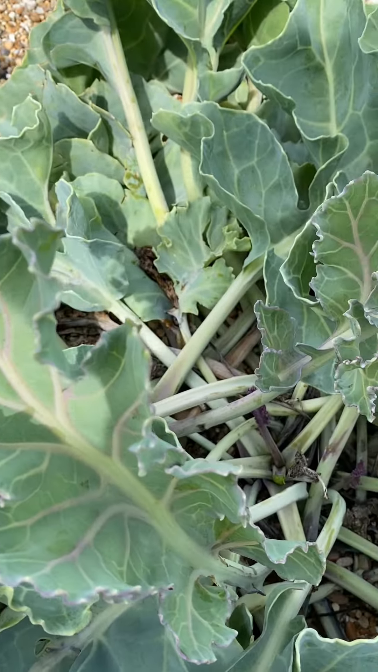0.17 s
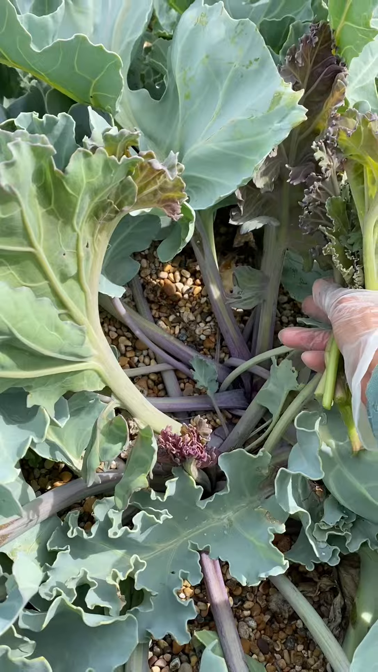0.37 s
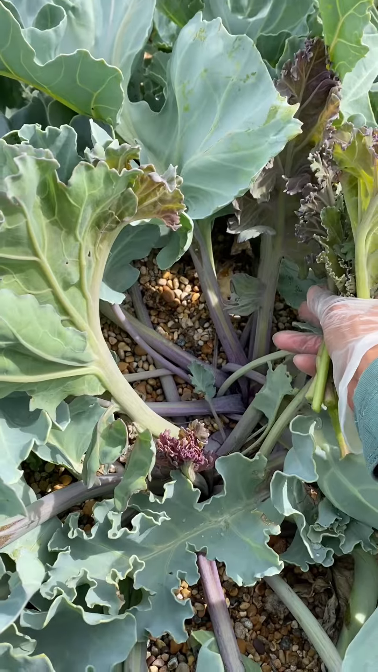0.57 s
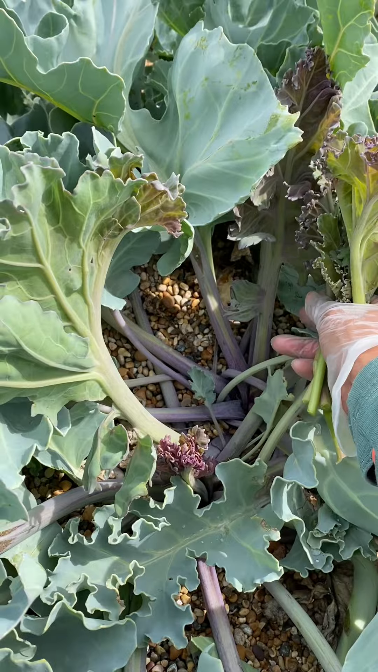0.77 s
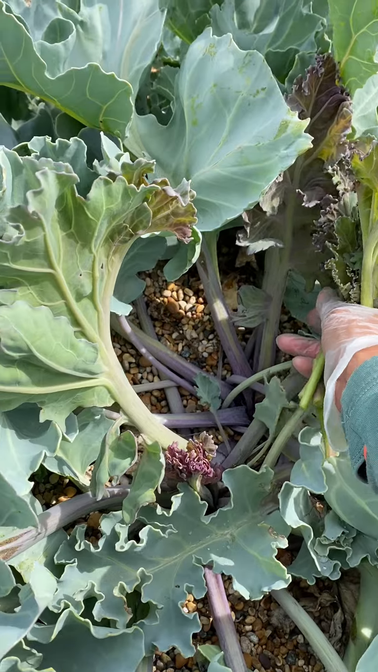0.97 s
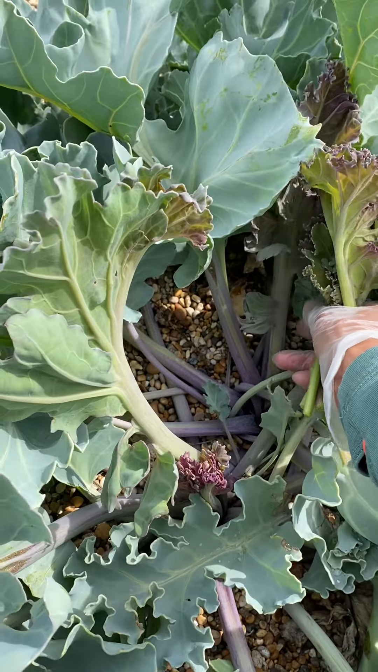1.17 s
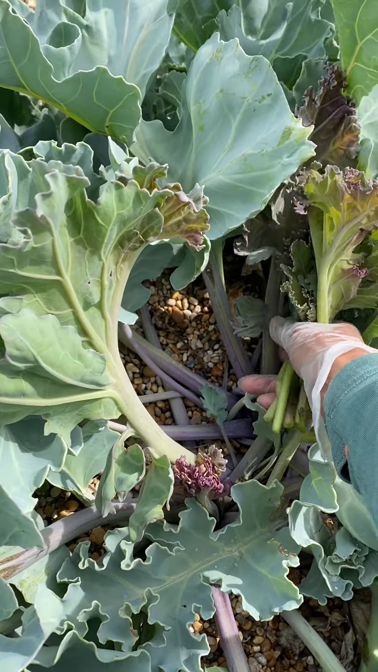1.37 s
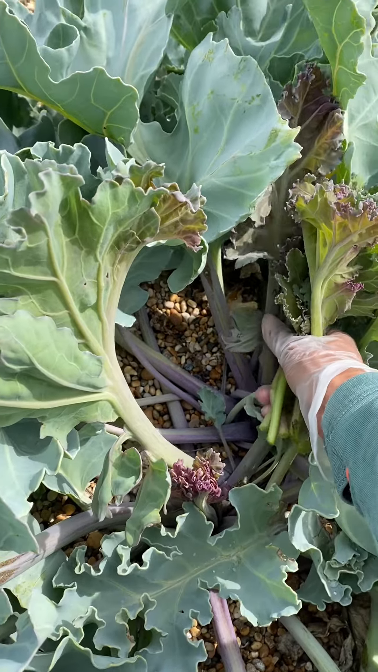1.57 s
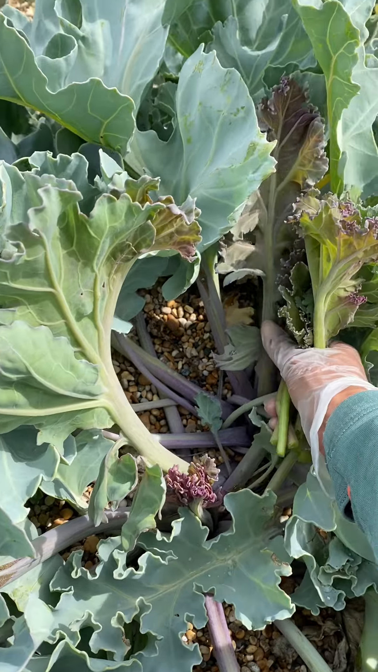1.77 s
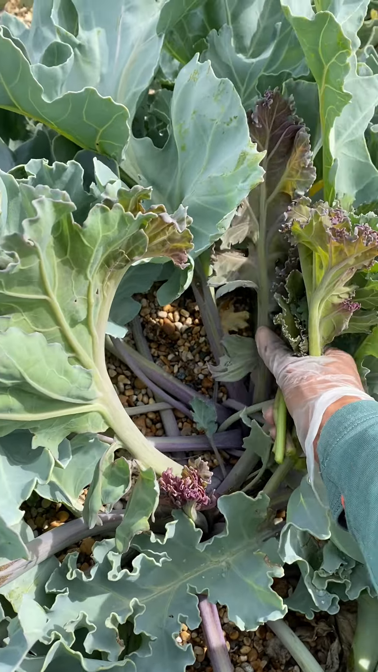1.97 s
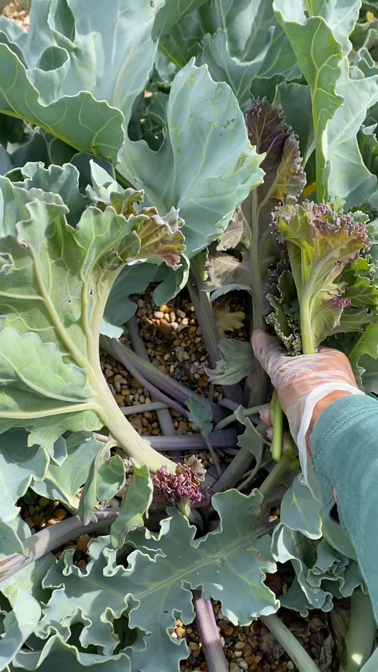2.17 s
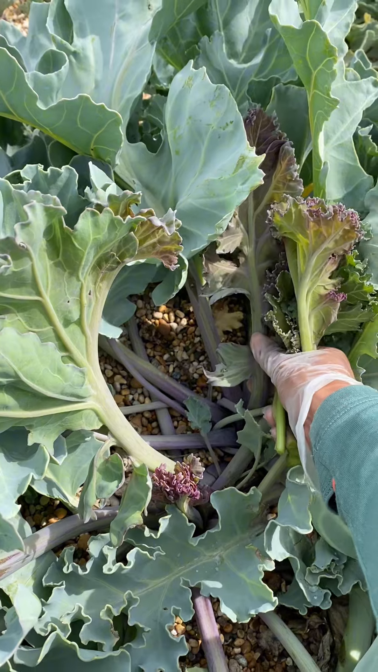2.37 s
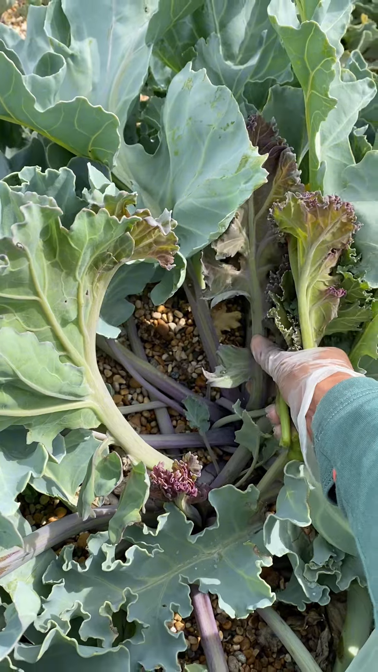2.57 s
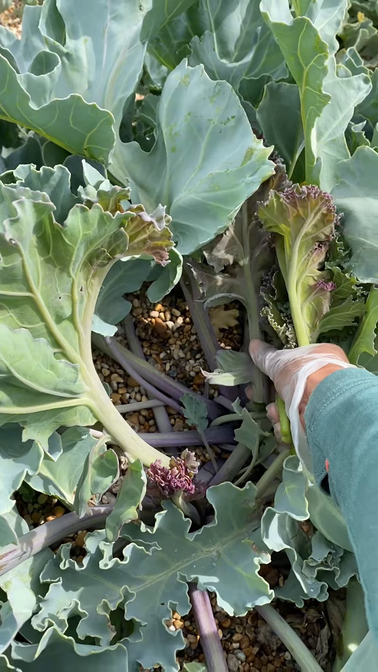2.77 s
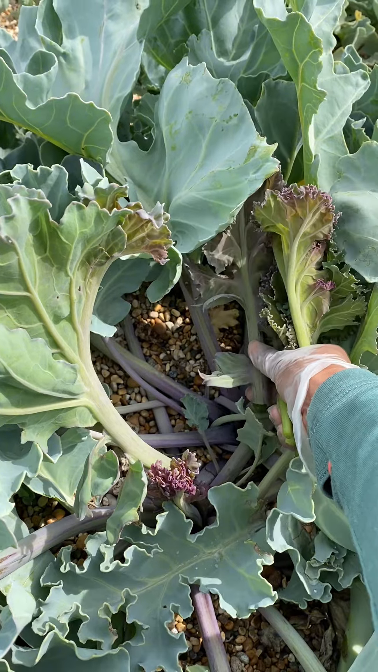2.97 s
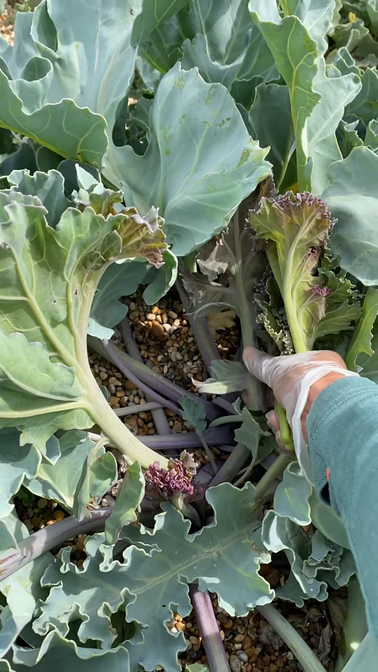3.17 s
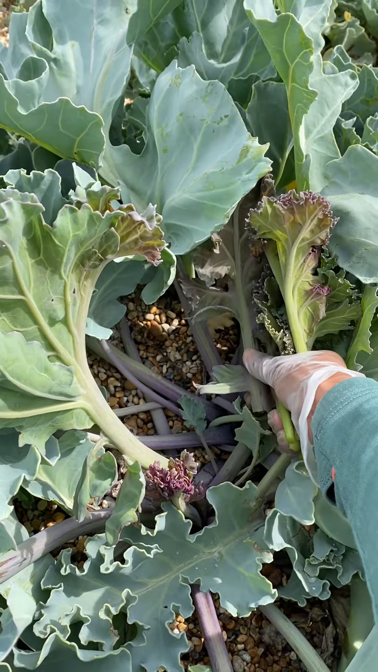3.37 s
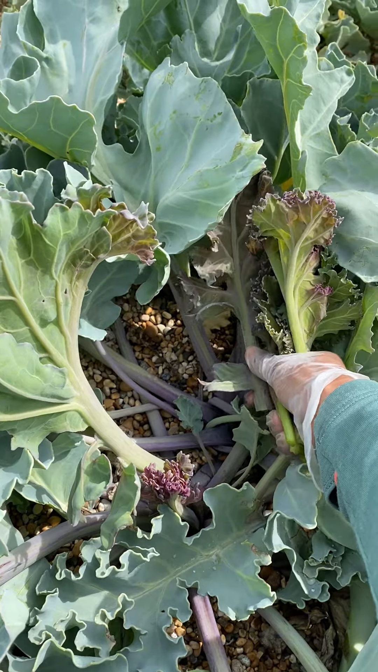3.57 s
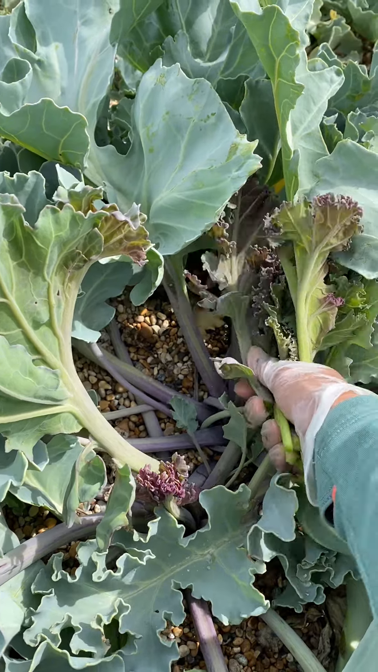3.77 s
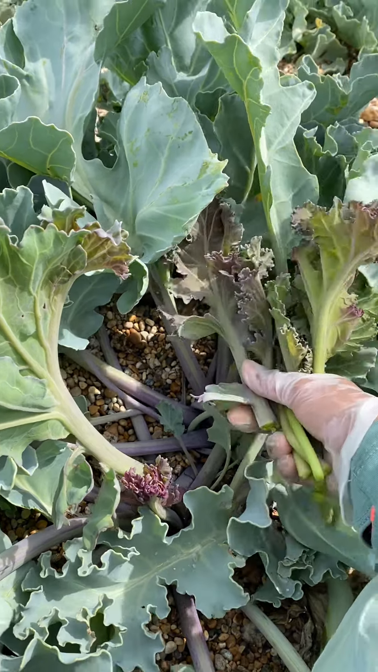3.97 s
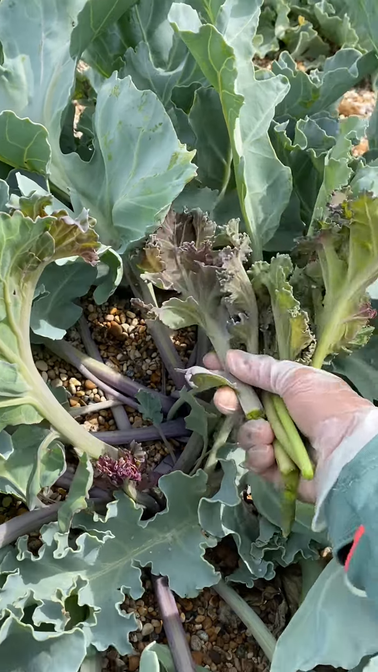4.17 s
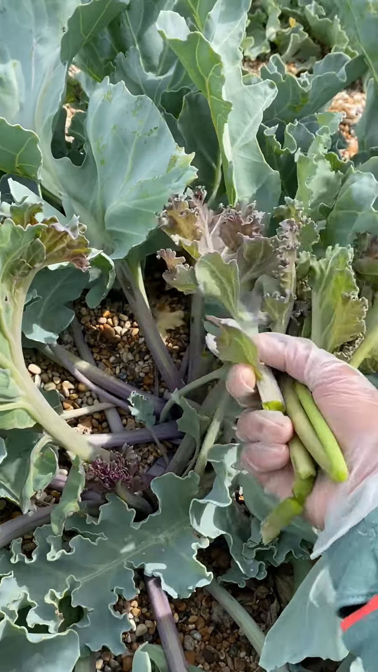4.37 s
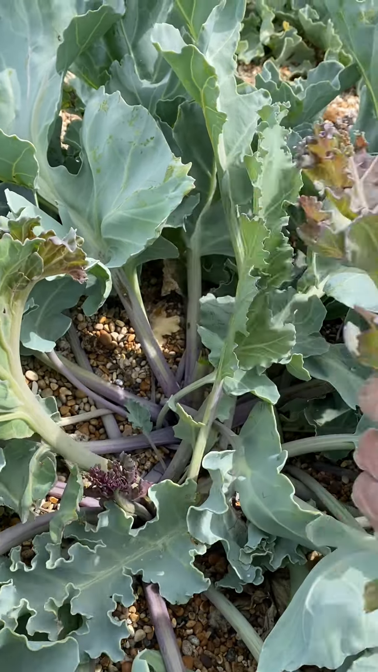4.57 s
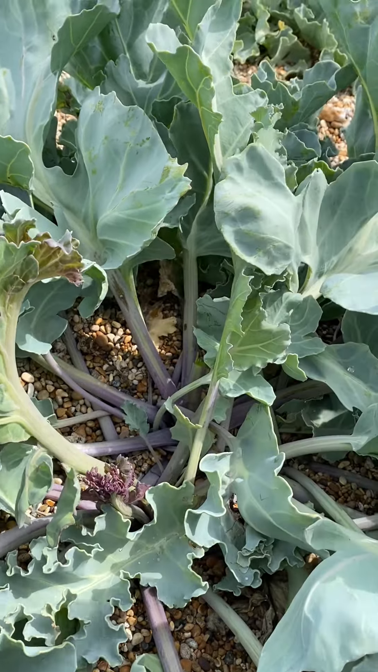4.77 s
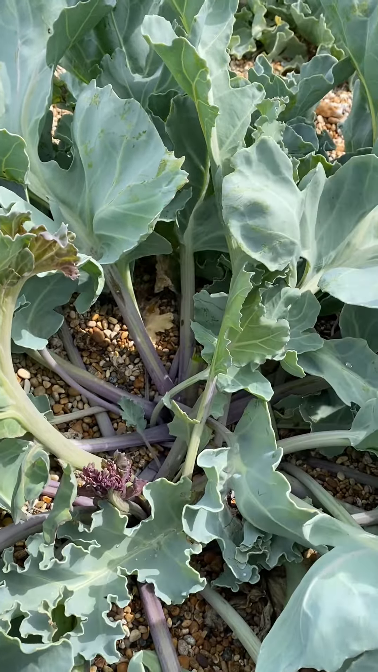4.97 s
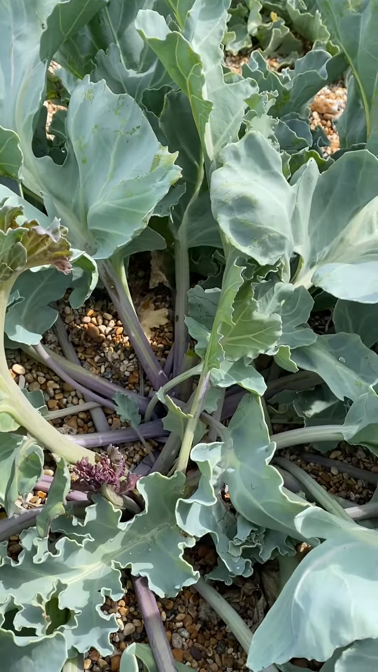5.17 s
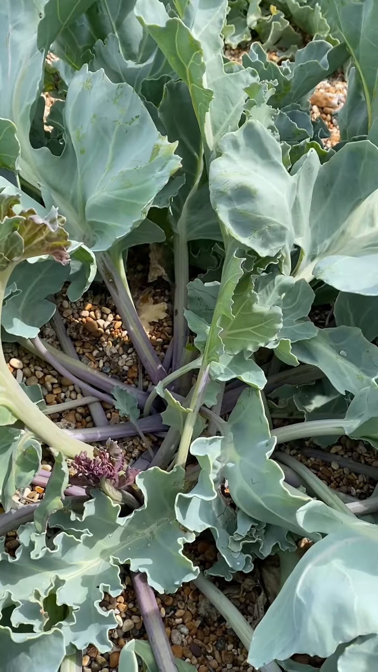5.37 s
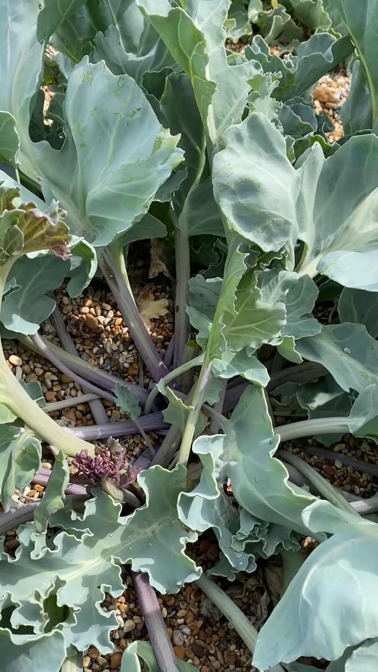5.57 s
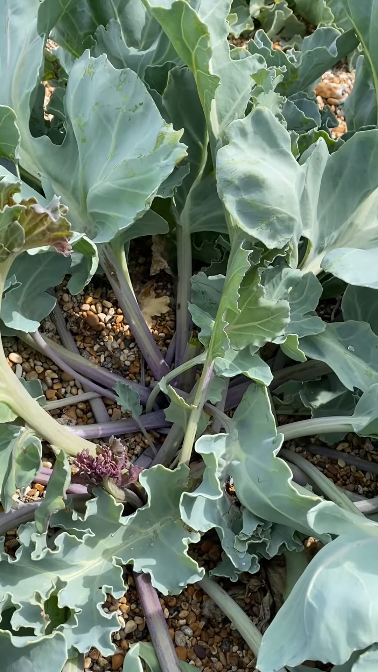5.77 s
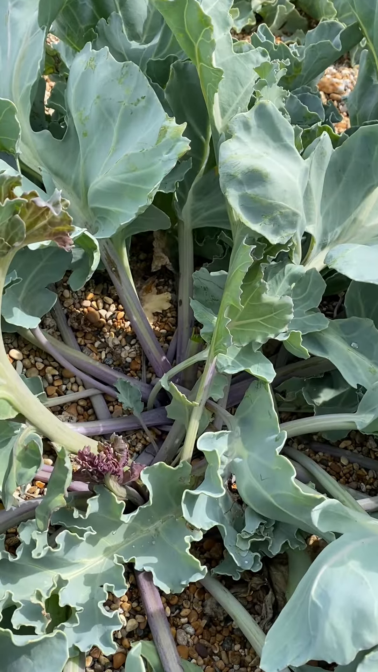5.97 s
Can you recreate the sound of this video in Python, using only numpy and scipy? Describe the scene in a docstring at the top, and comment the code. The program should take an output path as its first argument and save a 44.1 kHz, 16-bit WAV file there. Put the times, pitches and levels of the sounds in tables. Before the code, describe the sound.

A small stereo microphone outdoors takes gusts as low rumble, flutter and soft thumps, heaviest in the first half second, with a faint far hiss behind. A tiny snap comes at 0.1 s, a sharp tick at 0.33 and a clearer dry snap at 0.5. From 0.7 faint creaks begin, and thick waxy leaves rustle crisply from 0.9, crackles over a duller swish. From about 1.45 to 2.85 a bent stalk creaks in rapid stick-slip bursts, fibrous and juicy, dozens of tiny cracks, loudest near 2.75. Weaker creaking leads to fresh cracks from 3.1 to 3.45, with a strong gust thump at 3.3. Short pitched knocks colour the scattered snaps; a hard crack falls at 3.73, crisp rustle peaks at 4.03, and a bright snap hits at 4.4. Handling thins after 4.6; by 5.2 only wind, faint hiss and two tiny ticks at 5.56 and 5.84 remain.

```python
"""Wind rumbles, flutters and thumps on a small two-port microphone throughout, over a faint far hiss.
After a few early snaps, hands push through thick waxy leaves: tiny crackles on hiss, plus a duller swish.
A bent stalk soon creaks in rapid slips, densest near the middle: torn-fibre noise, ringing blade and stalk.
Short pitched rings (damped tones) join in, most often after 3 s; the handling thins out and the wind stays."""
import sys
import numpy as np
from scipy import signal
from scipy.fft import rfft, irfft, next_fast_len
from scipy.io import wavfile
from scipy.ndimage import uniform_filter1d, map_coordinates

SR = 44100
rng = np.random.default_rng(int(sys.argv[2]) if len(sys.argv) > 2 else 0)


def unload_wav(signal):
    """Save mono or channel-first audio to the path in sys.argv[1] as 16-bit WAV at rate SR, clipped to [-1, 1]."""
    wavfile.write(
        sys.argv[1],
        SR,
        np.round(np.clip(np.atleast_2d(signal).T, -1, 1) * 32767).astype(np.int16),
    )


N = 265614

# All source levels are ahead of the port response in record().
# Leaf rubbing: (time [s], crisp rustle [dB], broad-leaf swish [dB re rustle])
RUSTLE = [(.36, -70, -6), (.372, -48, -23.5), (.4, -66, -14), (.49, -58, -4), (.61, -64.5, -11),
          (.62, -64.5, 7), (.67, -62.5, 2.5), (.86, -61, 2), (.92, -37, -5.5), (1.0, -56, 5.5),
          (1.13, -38, -3.5), (1.33, -39.5, -4.5), (1.37, -29.5, -8.5), (1.41, -35, -0.5), (1.43, -44.5, -2),
          (1.6, -35, -8.5), (1.87, -31.5, -5.5), (2.1, -41, -1.5), (2.5, -35.5, 1.5), (2.68, -53, 5.5),
          (2.76, -37, 1.5), (2.83, -44, 2), (2.86, -53, 1), (2.91, -64.5, 1), (3.06, -45.5, -2),
          (3.18, -44, -5), (3.21, -44.5, -4), (3.25, -38.5, -2), (3.3, -50.5, -1), (3.43, -36.5, -2),
          (3.53, -48, 1.5), (3.64, -46.5, -4), (3.72, -29.5, -4), (3.87, -34.5, -5), (3.98, -40, 0),
          (4.03, -25, -13), (4.045, -37, -7), (4.15, -39, -0.5), (4.23, -37.5, -4.5), (4.38, -34.5, -5),
          (4.45, -45, -8.5), (4.61, -40.5, 0.5), (4.67, -41, -12.5), (4.78, -38, -1.5), (4.85, -44, -6.5),
          (5.0, -54.5, 4.5), (5.17, -61.5, -0.5), (5.2, -60, -21)]
# Steady hiss under the crackles: (time [s], share [re a full-level crackle])
STEADY_HISS = [(.6, 0.48), (1.4, 0.56), (1.55, 0.35), (3.6, 0.24), (3.75, 0.43), (5.2, 0.27)]
# Noise spectra of crisp rustle, swish and rubbing in the blade overtone: (frequency [Hz], level [dB per Hz])
CRISP_SPECTRUM = [(300, 1), (1000, -15), (3300, -3), (4300, -2), (4900, 2.5), (5600, 5), (6300, 2),
                  (8500, 3), (10000, 4), (12000, -3), (13500, -22), (15500, -31), (17000, -18)]
SWISH_SPECTRUM = [(300, -4.5), (600, -1.5), (1300, -1.5), (1750, -4.5), (2200, -2.5), (3000, -4),
                  (4000, -2), (8000, -58)]
RASP_SPECTRUM = [(2500, -40), (4400, -14), (4750, 0), (5150, 0), (5600, -14), (9000, -40)]
RASP_DB = -5  # re rustle, plus the struck overtone level

# Leaf blade: (time [s], share of higher ring [0-1], ring [dB re slip], struck overtone [dB re slip],
# rubbed ring [dB re swish])
BLADE = [(.55, 0.67, -9, -29, 1), (.65, 0.86, -2, -32, 1), (.95, 0.5, 1, -25, 3.5),
         (1.2, 0.2, -18, -11, -2.5), (1.39, 0.0, -19, -16, 5), (1.5, 0.42, -15, 3, -3),
         (2.85, 0.8, -6, -10.5, -6), (2.92, 0.6, -2.5, -10, -1), (3.09, 1, -6, -9, 3),
         (3.12, 0.78, -1.5, -4, -2), (3.9, 0.86, -16, -12, 0.5), (4.23, 0.76, 2, -5, -0.5),
         (4.4, 0.82, -25, -5.5, 0), (4.6, 0.2, -8, -14, -12.5)]
# Noise bands, lower then higher state: (ring [Hz], overtone [Hz], overtone level [dB])
BLADE_BANDS = [(2050, 4900, -2), (2550, 5000, -14)]
# Struck blade modes: (frequency [Hz], level at lower ring [dB], level at higher ring [dB])
RING_MODES = [(1974, 6.5, -5), (2470, -18, 7), (2930, -13, -2)]
OVERTONE_MODES = [(4790, -1, 0), (5090, 0, -3.5), (6250, -13, -6), (9490, -11, -1)]
RING_DECAY_S, OVERTONE_DECAY_S = .0024, .002  # time constants
NOISY_RING_DB = -5  # tearing noise in the ring, re struck ring

# Slips and snaps of stalks and leaf edges, each with its own body and length: (time [s], level [dB], stalk body
# [dB re level], length [ms])
SNAPS = [(0.134, -53, 7, 4.8), (0.4924, -21, -32, 1.6), (0.8715, -27, -13, 2.7), (0.9057, -39, 4.5, 13),
         (1.1262, -37, -3, 20), (1.1759, -21, -28, 4.2), (1.5458, -12, -29, 2.4), (1.5605, -16, -9.5, 3.2),
         (1.5882, -18, -8.5, 4.5), (1.6099, -18.5, -11, 7.3), (1.63, -19, -13.5, 9.5),
         (1.66, -19, -44, 5.9), (1.6886, -17, -15, 7.4), (1.7101, -17, -19, 6.1), (1.7331, -18, -12.5, 2.7),
         (1.9769, -21, -12.5, 7.5), (2.1628, -15, -15, 3.4), (2.176, -18, -14, 4), (2.2007, -16, -11.5, 5),
         (2.2231, -14.5, -19, 4), (2.2481, -14.5, -13, 3.2), (2.2692, -14, -13, 3.5),
         (2.2851, -17.5, -8, 4.8), (2.3265, -14, -12, 2.8), (2.3525, -14.5, -11.5, 4.1),
         (2.374, -20.5, -10, 20), (2.4112, -16.5, -15.5, 9), (2.436, -13, -11, 2.4),
         (2.4601, -16, -10, 3.7), (2.477, -13, -11.5, 4.8), (2.4943, -17, -7, 4.7), (2.525, -12.5, -5, 2.6),
         (2.5491, -13, -10.5, 3.8), (2.5707, -14.5, -15, 7.9), (2.5861, -12.5, -10, 4),
         (2.6018, -16, -6, 5.3), (2.6306, -18, -19, 5.3), (2.6541, -14.5, -8.5, 7.8),
         (2.6686, -15.5, -8.5, 5.8), (2.7046, -11.5, -15.5, 5.3), (2.7363, -16, -5, 4.4),
         (2.7571, -8.5, -13, 11.4), (2.8051, -16.5, -7.5, 4), (2.8373, -15, -15, 3.4),
         (3.1081, -13.5, -14, 5.9), (3.1225, -17.5, -17, 6.3), (3.1564, -15, -26, 7.2),
         (3.1693, -17, -9, 4.9), (3.222, -13.5, -11, 5), (3.2378, -17.5, -7.5, 3.9),
         (3.2614, -13, -11.5, 4.8), (3.3142, -25, -9, 4), (3.3295, -14, -13, 4.7),
         (3.4387, -12.5, -9.5, 5.3), (3.4499, -20.5, -9, 4.1), (3.4995, -44, -19, 2.5),
         (3.535, -51, 3, 7.1), (3.5694, -20.5, -18, 0.62), (3.6642, -24.5, -8, 4), (3.7205, -15, -18, 4.6),
         (3.7327, -8, -9.5, 5.8), (3.906, -24, -15, 15), (3.9467, -17, -11, 5.9), (4.1189, -19, -21, 8.5),
         (4.1325, -18, -7, 7), (4.1767, -26.5, -5, 4.7), (4.2343, -22, -7, 1.1), (4.2829, -26.5, -23, 7.6),
         (4.3504, -26.5, -5, 5), (4.3751, -24, -25, 4.3), (4.4034, -4.5, -29, 1.4), (4.4893, -28, -18, 3.1),
         (4.5191, -20, -6, 2.3), (4.5555, -26, -17, 1.9), (4.7943, -35, -1.5, 11), (4.9679, -44, 10, 3),
         (4.9764, -30.5, 1, 3.5), (5.1087, -56, 15, 3.6), (5.1355, -55.5, 14, 4.5), (5.5623, -39, -40, 8.1),
         (5.8436, -55, 12.5, 2.1)]
# Further stick-slips of the bent stalk, sharing one body level and a scattered length: (time [s], level [dB])
SLIPS = [(0.688, -39), (.7138, -43), (0.737, -36), (0.763, -48), (0.792, -36), (0.807, -29.5), (0.827, -31),
         (.8566, -40), (.885, -50), (0.9556, -30), (0.972, -24), (1.014, -29), (1.042, -29),
         (1.4504, -29.5), (1.4813, -27), (1.514, -28.5), (1.6252, -23.5), (1.6463, -24), (1.6811, -25),
         (1.6999, -19), (1.722, -21.5), (1.7664, -20), (1.8013, -19), (1.82, -23), (1.851, -23),
         (1.8793, -21.5), (1.899, -22), (1.9085, -21), (1.92, -21), (1.9341, -19.5), (1.9492, -25),
         (1.992, -18.5), (2.004, -24), (2.016, -17.5), (2.0254, -19), (2.0368, -18.5), (2.049, -23.5),
         (2.062, -17.5), (2.076, -20), (2.0908, -16.5), (2.1056, -20.5), (2.118, -21), (2.1362, -16.5),
         (2.1496, -21), (2.214, -24.5), (2.3105, -19), (2.387, -24), (2.506, -18.5), (2.515, -18.5),
         (2.5604, -18), (2.6436, -22), (2.7198, -18), (2.7498, -12.5), (2.7903, -19.5), (2.8133, -16.5),
         (2.9174, -25), (2.9337, -27.5), (2.948, -25), (2.9649, -28.5), (2.9798, -26), (2.995, -27),
         (3.0146, -27.5), (3.0354, -29), (3.058, -31), (3.0722, -32.5), (3.084, -30), (3.092, -25.5),
         (3.346, -30), (3.3663, -24.5), (3.39, -24), (3.578, -33.5), (3.5954, -30), (3.678, -27),
         (3.6888, -22), (3.699, -32), (3.708, -42), (3.7174, -17.5), (4.051, -25), (4.0679, -30),
         (4.0888, -22.5), (4.0975, -22.5), (4.1044, -27), (4.451, -28.5), (4.543, -37)]
SLIP_BODY_DB, SLIP_MS = -13.5, 4.63  # body re level; median length
# Noisy tearing in a slip: (time [s], level [dB re slip])
TEARING = [(.6, -9), (1.5, -4), (2.3, -3), (2.85, -2.5), (2.92, -9), (3.09, -9), (3.12, -2.5)]
TEAR_HALF, BODY_HALF = 0.85, 1.33  # half-level time as a share of slip length
CLICK_DB, CLICK_HALF_MS = 0, .5  # first fibre breaking, re tearing
# Noise spectra of tearing and stalk body: (frequency [Hz], level [dB per Hz])
TEAR_SPECTRUM = [(600, -5.5), (1500, -19), (2200, -8.5), (3300, 0), (4300, 1.5), (4900, -3), (5600, 2.5),
                 (7500, 1), (8500, -1), (10000, 3), (12000, -4.5), (13500, -9), (15500, -13), (17000, -20)]
BODY_SPECTRUM = [(200, -23), (350, -1.5), (550, -4.5), (750, -2.5), (950, 1), (1330, 0.5), (1600, 0),
                 (2000, -2.5), (3000, -7.5), (6000, -47)]
# Stalk modes: (frequency [Hz], level [dB re stalk body], t60 before the cap [s])
STALK_MODES = [(387, -7, 0.048), (716, -2, 0.016), (1334, 0.5, 0.025)]
# Freedom of the stalk to ring in the hand: (time [s], gain [dB])
STALK_FREEDOM = [(.6, -16), (1.5, -8), (1.56, 0.5), (1.8, 7.5), (2.3, -5), (2.8, -1), (2.95, -13.5),
                 (3.2, -10), (3.45, 3), (4.2, -10), (5.0, -10)]
# Short pitched rings, many at a slip: (time [s], frequency [Hz], level [dB], t60 before the cap [s])
PITCHED_RINGS = [(.9061, 1500, -18, 0.016), (1.5614, 386, -18.5, 0.029), (3.108, 1367, -22, 0.043),
                 (3.125, 1360, -19, 0.024), (3.159, 1390, -14.5, 0.034), (3.172, 1340, -17, 0.024),
                 (3.223, 1970, -32, 0.049), (3.263, 1370, -17, 0.029), (3.331, 1350, -21, 0.026),
                 (3.395, 504, -28.5, 0.038), (3.41, 480, -25.5, 0.025), (3.443, 378, -24.5, 0.043),
                 (3.734, 568, -15.5, 0.014), (3.439, 2630, -11.5, 0.017), (4.119, 2710, -14.5, 0.026),
                 (4.139, 890, -35, 0.035), (4.177, 2200, -24, 0.024), (4.234, 2620, -16, 0.021),
                 (4.284, 1440, -32, 0.017), (4.354, 1550, -22.5, 0.018), (4.803, 440, -25.5, 0.023),
                 (4.896, 700, -39, 0.023), (4.97, 560, -30, 0.017), (5.11, 825, -38, .05),
                 (5.113, 375, -38, 0.071), (5.843, 510, -40.5, .025), (5.8435, 1510, -46, .012)]
T60_CAP_S = .045  # juicy stalks damp fast

# Gusts on the ports: (time [s], rumble [dB], flutter [dB re rumble])
WIND = [(0.0, -20, -11), (0.03, -20.5, -21), (0.42, -25, -7.5), (0.48, -39.5, -25), (0.85, -43, -0.5),
        (0.91, -25, -9.5), (1.52, -30.5, -13.5), (1.57, -38, 0.5), (2.08, -40, -7), (2.23, -22.5, -26.5),
        (2.48, -34, -7), (2.58, -29, -18.5), (3.17, -40, -13.5), (3.32, -15, -21.5), (3.37, -27.5, -15),
        (3.45, -41, -4), (3.55, -27.5, -13.5), (3.66, -43.5, -28), (3.7, -25.5, -12), (3.79, -43, -18),
        (3.94, -26, -6), (4.11, -44.5, -4.5), (4.22, -30.5, -12.5), (4.43, -47, -7), (4.9, -43.5, -4.5),
        (4.95, -26, -21.5), (5.0, -40.5, -6.5), (5.28, -43.5, -18), (5.45, -43.5, -14),
        (5.48, -34.5, -20.5), (5.62, -41.5, -13), (5.97, -41.5, -9), (6.02, -31, -24)]
# Single eddies: (crest time [s], peak before the eddy cut [dB], push +1 or pull -1, frequency at crest [Hz])
THUMPS = [(0.0906, -8.5, -1, 60), (0.146, -10, 1, 115), (0.1956, -18, -1, 100), (0.2252, -9, -1, 89.5),
          (0.337, -1.5, -1, 126), (0.4157, -10, 1, 84), (0.667, -26, -1, 93), (0.924, -11, 1, 98),
          (1.1372, -9.5, -1, 125), (1.427, -10.5, -1, 101), (2.186, -15, -1, 80), (2.602, -17, -1, 107),
          (2.682, -18, 1, 108), (2.7696, -15, 1, 240), (2.9744, -19, -1, 73), (3.3063, -5.5, -1, 102),
          (3.559, -18.5, -1, 144), (3.9069, -18, -1, 123), (3.935, -21, -1, 134), (4.953, -28, -1, 72.5),
          (5.469, -24.5, 1, 83.6)]
# Sharp ticks: (time [s], level [dB])
TICKS = [(0.3345, -10), (0.3549, -32)]
# Wind spectra: (frequency [Hz], level [dB per Hz])
RUMBLE_SPECTRUM = [(22, -30), (31, -13), (40, -1), (59, 4.5), (97, 1.5), (156, -9.5), (200, -15),
                   (260, -38), (440, -120)]
FLUTTER_SPECTRUM = [(90, -37), (150, 0.5), (250, -1), (400, -9), (540, -24), (700, -34), (1500, -52)]
CALM_DB, LUMPS_PER_DB = -57, 0.15  # extra flutter lumpiness per dB of rumble above calm
EDDY_CUT_HZ = 37

# Far hiss: (frequency [Hz], level [dB per Hz])
FAR_SPECTRUM = [(150, -1.5), (300, -3.5), (500, -11.5), (800, -18), (1300, -22), (2000, -24.5), (4200, -31),
                (6500, -37.5), (10000, -25), (12000, -38), (13500, -42), (15500, -51)]
FAR_DB = -51

# Left-right correlation of near and far noise: (frequency [Hz], correlation [0-1])
NEAR_ALIKE = [(300, 0.07), (700, 0.37), (1500, 0.99), (2300, 0.96), (2900, 0), (4500, 0.05), (5200, 0.55),
              (7300, 0.99), (8900, 0.87), (10200, 1), (12200, 0.26), (13800, 1), (16000, .7)]
FAR_ALIKE = [(200, 0.27), (700, 0.018), (4500, 0.081), (5500, 0.76), (7300, 1), (8900, 0.67), (10500, 1),
             (12200, .6), (13800, 0.84)]
# Phase between channels: (frequency [Hz], phase [half turns])
CHANNEL_TURN = [(2400, 0), (3600, .45), (5000, .05), (7150, 1), (7600, 1), (9800, 2), (11200, 2),
                (12800, 3), (14200, 3), (15700, 4)]
# Port level difference: (frequency [Hz], left minus right [dB])
PORT_BALANCE = [(750, 0.5), (1500, 0.5), (2700, -2), (4200, -2.5), (6000, 0)]
LOW_CUT_HZ, TOP_HZ = 33, 15900


def leaves():
    """Rubbing waxy leaves: dense crackles on hiss shape crisp noise, broad-blade swish and rasp."""
    crisp_db, swish_db = curves(RUSTLE)
    _, _, overtone_db, rubbed_db = curves(BLADE)
    when, depth, spread = rng.random((1500, 3)).T
    crackle = bursts(when * N / SR, amp(-24 * depth), 0.0017, 0.00089 + 0.0018 * spread)
    grain = unit(curves(STEADY_HISS)[0] + crackle)
    crisp = amp(crisp_db) * rush(CRISP_SPECTRUM, NEAR_ALIKE, patchy_db=3.5)
    broad = rush(SWISH_SPECTRUM, NEAR_ALIKE, patchy_db=2)
    rubbed = amp(rubbed_db) * blade_noise(width_hz=730, patchy_db=4.0)
    swish = amp(crisp_db + swish_db) * (broad + rubbed)
    rasp = amp(crisp_db + overtone_db + RASP_DB) * rush(RASP_SPECTRUM, NEAR_ALIKE, patchy_db=6)
    return grain * (crisp + swish + rasp)


def stalks():
    """Slips tear fibres for a few ms and ring the blade; the juicy stalk answers lower and longer."""
    s, db, body_db, length_ms = np.concatenate([SNAPS, creaks()]).T
    length_s = length_ms / 1000
    # fibres part one by one: spiky tearing
    fibres = unit(amp(3 * wobble(1500)))
    torn = fibres * rush(TEAR_SPECTRUM, NEAR_ALIKE, patchy_db=0.5)
    noisy_ring = amp(curves(BLADE)[1] + NOISY_RING_DB) * blade_noise(width_hz=1200, patchy_db=-0.5)
    tear_db = db + np.interp(s, *np.transpose(TEARING))
    click = bursts(s, amp(tear_db + CLICK_DB), 0.00057, np.full(len(s), CLICK_HALF_MS / 1000))
    tearing = bursts(s, amp(tear_db), 0.00088, TEAR_HALF * length_s)
    crack = np.hypot(click, tearing) * (torn + noisy_ring)
    body_envelope = bursts(s, amp(db + body_db), 0.005, BODY_HALF * length_s)
    body = body_envelope * rush(BODY_SPECTRUM, NEAR_ALIKE, patchy_db=3.5)
    pitched = rings(*np.transpose(PITCHED_RINGS))
    return crack + body + blade_strikes(s, db, body_db) + stalk_ring(s, db + body_db) + pitched


def creaks():
    """Stick-slip events as SNAPS rows: one body level, a little scatter in length."""
    s, db = np.transpose(SLIPS)
    length_ms = SLIP_MS * amp(1.2 * rng.standard_normal(len(s)))
    return np.transpose([s, db, np.full(len(s), SLIP_BODY_DB), length_ms])


def blade_noise(width_hz, patchy_db):
    """Noise in the blade's ring and overtone, gliding between a lower and a higher state."""
    def band(hz, width_hz):
        """One noise band around a blade resonance."""
        skirts = [(hz / 3, -35), (hz - width_hz, -12), (hz, 0), (hz + width_hz, -12), (hz * 2, -35)]
        return rush(skirts, NEAR_ALIKE, patchy_db)

    share = curves(BLADE)[0]
    low, high = [band(hz, width_hz) + amp(db) * band(over_hz, width_hz / 2)
                 for hz, over_hz, db in BLADE_BANDS]
    return np.sqrt(1 - share) * low + np.sqrt(share) * high


def blade_strikes(s, db, body_db):
    """Each slip strikes the blade's modes: short damped tones with slight pitch and level scatter."""
    when, share, ring_db, overtone_db, _ = np.transpose(BLADE)
    t = np.arange(SR // 50) / SR
    out = np.zeros(N)
    higher = np.interp(s, when, share)
    # thin, dry snaps hardly move the blade
    strike_db = db + np.minimum(body_db + 18, 0)
    groups = [(RING_MODES, ring_db, RING_DECAY_S), (OVERTONE_MODES, overtone_db, OVERTONE_DECAY_S)]
    for modes, group_db, decay_s in groups:
        level_db = strike_db + np.interp(s, when, group_db)
        envelope = (1 - np.exp(-t / 0.0005)) * np.exp(-t / decay_s)
        for hz, low_db, high_db in modes:
            draw = rng.standard_normal((len(s), 2))
            pitch_hz = hz * (1 + .008 * draw[:, :1])
            mode_db = low_db + higher * (high_db - low_db)
            gain = amp(level_db + mode_db + 2.6 * draw[:, 1])
            out += overlap(s, gain[:, None] * np.sin(2 * np.pi * pitch_hz * t) * envelope)[:N]
    return out


def stalk_ring(s, db):
    """Each slip strikes the stalk's modes, with scattered pitch and level."""
    draw = rng.standard_normal((len(s), 6))
    free_db = db + np.interp(s, *np.transpose(STALK_FREEDOM))
    out = np.zeros(N)
    for k, (hz, mode_db, t60_s) in enumerate(STALK_MODES):
        pitch_hz = hz * (1 + 0.029 * draw[:, k])
        out += rings(s, pitch_hz, free_db + mode_db + draw[:, 3 + k], np.full(len(s), t60_s))
    return out


def rings(s, hz, db, t60_s):
    """One damped tone per event, its t60 capped."""
    t = np.arange(SR // 20) / SR
    decay_db = -60 * t / np.minimum(t60_s, T60_CAP_S)[:, None]
    attack = 1 - np.exp(-t / 0.00064)
    return overlap(s, amp(db[:, None] + decay_db) * np.sin(2 * np.pi * hz[:, None] * t) * attack)[:N]


def wind():
    """Turbulence on the ports: lumpy rumble, faster flutter on top, and single eddies."""
    rumble_db, flutter_db = curves(WIND)
    lumps = wobble(22.056)
    rumble_noise = rush(RUMBLE_SPECTRUM, [(30, 0.93), (150, 0.66)], patchy_db=-1.0)
    rumble = amp(rumble_db) * unit(amp(1.3 * lumps) * rumble_noise)
    gust_lumps_db = 4.6 * lumps + LUMPS_PER_DB * (rumble_db - CALM_DB) * wobble(45)
    flutter_noise = rush(FLUTTER_SPECTRUM, [(150, 1.0), (500, 0.1)], patchy_db=4)
    flutter = amp(rumble_db + flutter_db) * unit(amp(gust_lumps_db) * flutter_noise)
    return rumble + flutter + thumps()


def thumps():
    """Single eddies: a main swing with short lead-in and slower, longer rebound; low end cut."""
    half = SR // 25
    t = np.arange(-half, half) / SR
    eddies = np.zeros(N + SR)
    for s, db, sign, hz in THUMPS:
        cycles = hz * t * (1 - 12 * t)  # pitch falls
        fade = np.exp(-(cycles * np.where(t < 0, 3.5, 2.2)) ** 2)
        start = round(s * SR) - half
        eddies[start:start + len(t)] += sign * amp(db) * np.cos(2 * np.pi * cycles) * fade
    return filtered(eddies[:N], lambda hz: low_cut(hz, EDDY_CUT_HZ))


def ticks():
    """Sharp ticks: sudden step, exponential release."""
    t = np.arange(SR // 25) / SR
    out = np.zeros(N)
    for s, db in TICKS:
        start = round(s * SR)
        out[start:start + len(t)] += amp(db) * np.exp(-t / 0.0083)
    return out


def shore():
    """Far surf and wind in the plants: smooth hiss of slowly wavering level."""
    return amp(FAR_DB + .6 * wobble(11.0)) * rush(FAR_SPECTRUM, FAR_ALIKE, patchy_db=1.5)


def amp(db):
    """Gain of a level in dB."""
    return 10 ** (np.asarray(db) / 20)


def unit(x):
    """x at rms 1."""
    return x / np.sqrt(np.mean(x ** 2) + 1e-20)


def along(points, hz):
    """(Hz, value) points interpolated on a log frequency axis."""
    f, v = np.transpose(points)
    return np.interp(np.log(hz + 1), np.log(f + 1), v)


def curves(rows):
    """One value per sample for each column after the time."""
    s, *cols = np.transpose(rows)
    return [np.interp(np.arange(N) / SR, s, c) for c in cols]


def wobble(rate_hz):
    """Smooth random curve, rate_hz knots a second."""
    knots = rng.standard_normal(int(N * rate_hz / SR) + 4)
    return map_coordinates(knots, [np.arange(N) * rate_hz / SR])


def filtered(x, response):
    """x times a complex response of frequency."""
    m = next_fast_len(N + 8192)
    return irfft(rfft(x, m) * response(np.fft.rfftfreq(m, 1 / SR)), m)[..., :N]


def low_cut(hz, cut_hz):
    """Second-order high-pass magnitude, 3 dB down at cut_hz."""
    return hz ** 2 / np.hypot(hz ** 2, cut_hz ** 2)


def rush(spectrum, alike, patchy_db):
    """Stereo noise of rms 1 with time-frequency patches of random gain and set correlation."""
    z = signal.stft(rng.standard_normal((2, N)), nperseg=256)[2]
    field = rng.standard_normal(z.shape[1:])
    field = uniform_filter1d(uniform_filter1d(field, 5, 0), 4, 1)
    pair = signal.istft(z * amp(patchy_db * unit(field)), nperseg=256)[1][:, :N]

    def mid_side(hz):
        """Spectrum split into mid and side by the correlation."""
        angle = np.arccos(np.clip(along(alike, hz), -1, 1)) / 2
        return amp(along(spectrum, hz)) * [np.cos(angle), np.sin(angle)]

    mid, side = filtered(pair, mid_side)
    return unit(np.array([mid + side, mid - side]))


def overlap(s, waves):
    """Sum of one wave per row, each starting at its time."""
    at = (s * SR).astype(int)[:, None] + np.arange(waves.shape[1])
    return np.bincount(at.ravel(), waves.ravel(), N + SR)


def bursts(s, gains, rise_s, half_s):
    """Envelope of short bursts summed in power: quick rise, decay factor one half at half_s."""
    t = np.arange(SR // 20) / SR
    rise = np.sin(np.pi / 2 * np.clip(t / rise_s, 0, 1))
    decay = .5 ** ((t / half_s[:, None]) ** 1.42)
    return np.sqrt(overlap(s, (gains[:, None] * rise * decay) ** 2)[:N])


def scene():
    """All sources at the two ports."""
    return leaves() + stalks() + wind() + ticks() + shore()


def record(dry):
    """Channels differ in level and treble phase; deepest bass is cut, nothing passes above TOP_HZ."""
    f, turn = np.transpose(CHANNEL_TURN)

    def ports(hz):
        """Left and right responses: opposite half phases and half level differences."""
        phase = .5j * np.pi * np.interp(hz, f, turn)
        level = np.log(amp(along(PORT_BALANCE, hz) / 2))
        band = (hz < TOP_HZ) * low_cut(hz, LOW_CUT_HZ)
        return np.exp(np.outer([1, -1], phase + level)) * band

    return filtered(dry, ports)


dry = scene()
out = record(dry)
unload_wav(out)
```